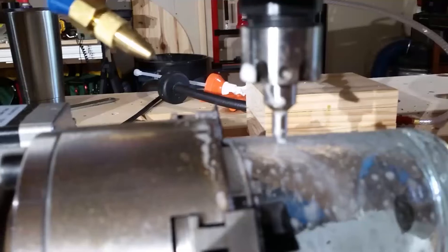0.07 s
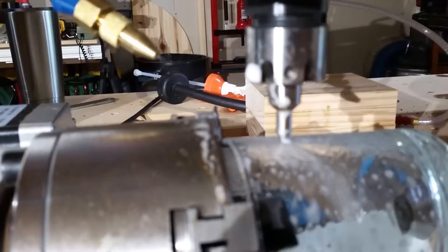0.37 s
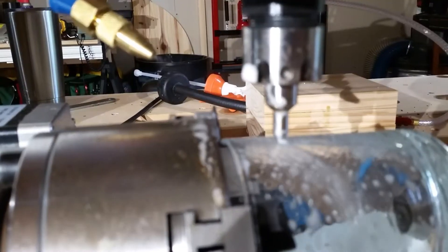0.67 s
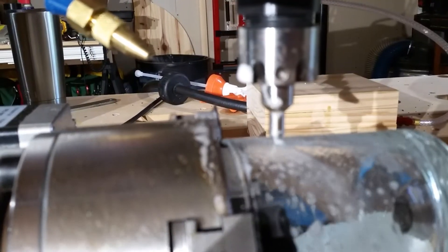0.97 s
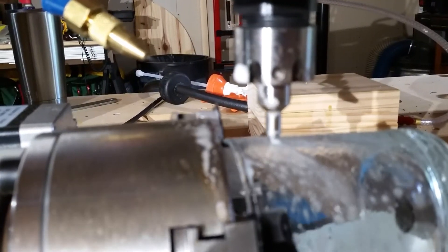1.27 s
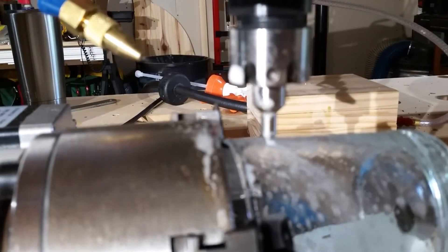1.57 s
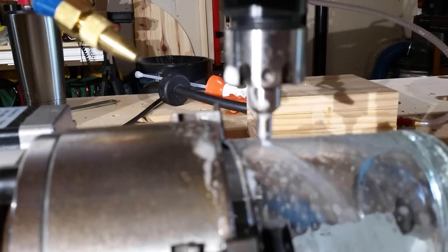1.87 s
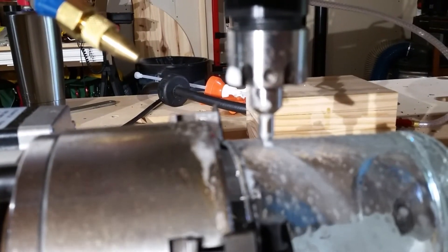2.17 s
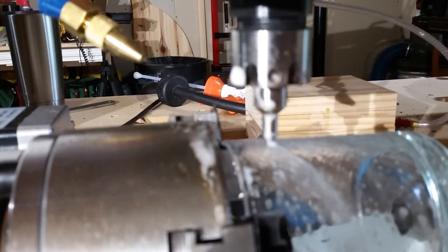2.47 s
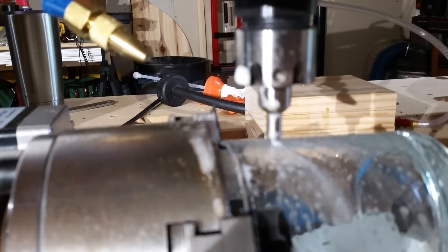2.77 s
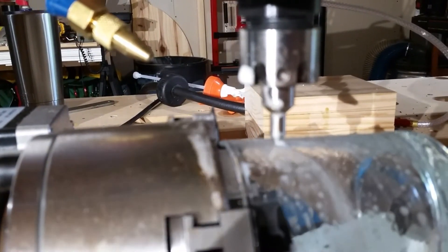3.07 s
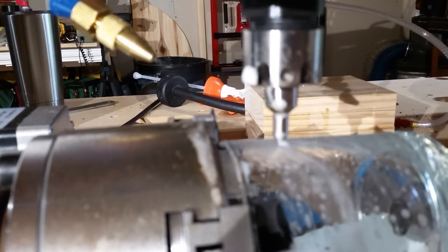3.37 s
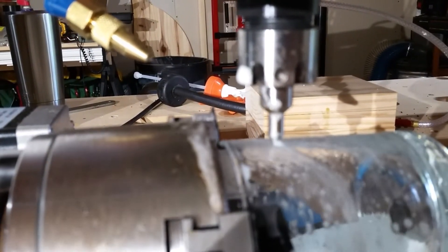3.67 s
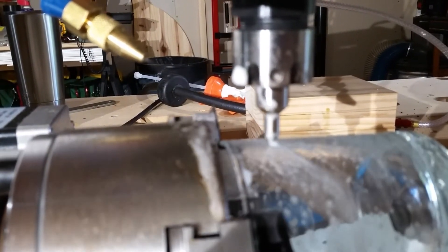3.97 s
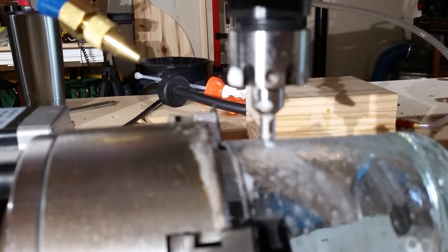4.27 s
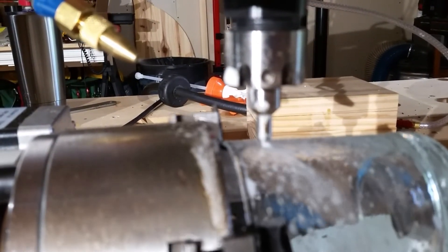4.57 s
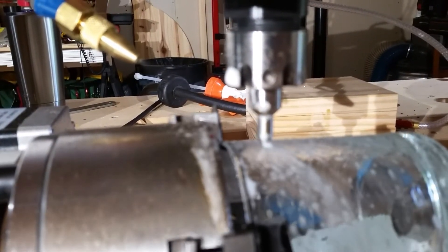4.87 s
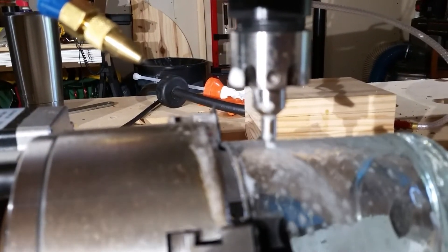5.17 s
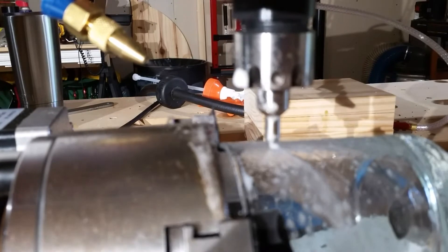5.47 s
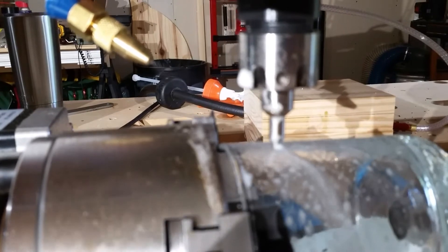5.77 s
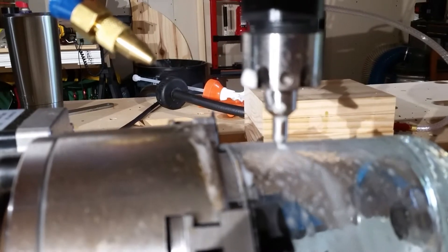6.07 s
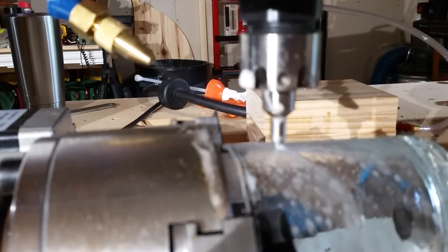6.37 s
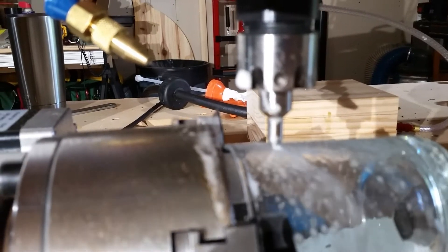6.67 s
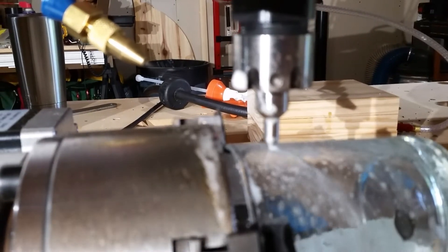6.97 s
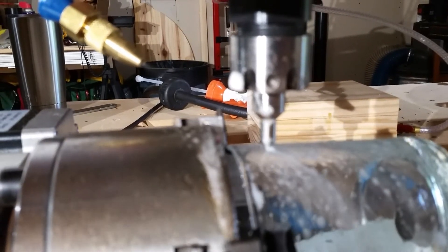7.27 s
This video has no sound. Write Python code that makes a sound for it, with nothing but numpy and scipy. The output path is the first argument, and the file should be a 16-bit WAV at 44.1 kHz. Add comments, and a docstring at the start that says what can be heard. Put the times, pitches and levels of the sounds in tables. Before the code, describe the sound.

Close workshop sound of glass being engraved: bursts of gritty chipping ticks above a steady spindle drone and bright spray hiss.

```python
"""Engraving a glass bottle

A diamond bit scratches a bottle turning in a rotary chuck and chips it in runs of short, damped ticks.
The spindle throbs once a turn, the frame rumbles and a coolant mist hisses; all three rise and fall
together in level. The sound is close and fades in; a limiter briefly ducks it around the hardest ticks."""
import sys
import numpy as np
from scipy import signal
from scipy.fft import rfft, irfft, next_fast_len
from scipy.io import wavfile
from scipy.ndimage import uniform_filter1d, minimum_filter1d, map_coordinates

SR = 44100
rng = np.random.default_rng(int(sys.argv[2]) if len(sys.argv) > 2 else 0)


def generate_wav(sig):
    """Save sig (samples, or channels by samples) to the path in sys.argv[1] as 16-bit PCM at SR."""
    pcm = np.round(np.clip(np.atleast_2d(sig).T, -1, 1) * 32767).astype(np.int16)
    wavfile.write(sys.argv[1], SR, pcm)


N = 322812


def amp(db):
    """Decibels to gain."""
    return 10 ** (np.asarray(db) / 20)


def unit(x):
    """Scale to rms 1."""
    return x / np.sqrt(np.mean(x ** 2) + 1e-20)


def pan(right_db):
    """Left and right gains, right_db apart."""
    return amp([[-right_db / 2], [right_db / 2]])


def along(rows, hz, column=1):
    """One column of a frequency table, read on a log axis."""
    table = np.transpose(rows)
    return np.interp(np.log(hz + 1), np.log(table[0] + 1), table[column])


def lift(peaks, hz):
    """Boost in dB from narrow resonances."""
    return sum(db * np.exp(-((hz - centre) / width) ** 2) for centre, width, db in peaks)


def curve(rows):
    """One value per sample from (seconds, value) rows."""
    return np.interp(np.arange(N) / SR, *np.transpose(rows))


def wobble(knots_per_s):
    """Smooth random curve."""
    knots = rng.standard_normal(int(N * knots_per_s / SR) + 4)
    return map_coordinates(knots, [np.arange(N) * knots_per_s / SR])


def filtered(x, response):
    """Apply a complex frequency response."""
    size = next_fast_len(N + SR // 2)
    return irfft(rfft(x, size) * response(np.fft.rfftfreq(size, 1 / SR)), size)[..., :N]


# Modes of the clamped, wet bottle. Each row: centre in Hz, width in Hz, left in dB, right in dB.
BOTTLE_MODES = [(2000, 440, -23, -1.5), (2850, 93, -10, 17), (2990, 150, -30, 11), (4010, 180, -31, 6.5),
                (5520, 280, -16, -1.5), (6190, 96, -24, -2), (7907, 130, -14, 12.5), (9535, 140, 2, 17.5),
                (10300, 1000, -30, -3), (11700, 240, -9, 2), (13430, 200, -18, 2), (14400, 290, -35, -18)]


def bottle(hz, crack_db=-13, low_cut_hz=1400):
    """Stereo response of the glass: damped modes plus the bare crack."""
    modes = sum(amp([[left], [right]]) * 1j * hz * width / (centre ** 2 - hz ** 2 + 1j * hz * width)
                for centre, width, left, right in BOTTLE_MODES)
    radiation = (1j * hz / (low_cut_hz + 1j * hz)) ** 2  # a small wall radiates little bass
    return (modes + amp(crack_db) * pan(8)) * radiation


# Large chips breaking off. Each row: start in seconds, level in dB, relative treble in dB.
LARGE_CHIPS = [(0.6507, -25, 4), (0.7732, -32.5, 2), (0.801, -35, 1), (0.8384, -33, 1), (0.8656, -37, 3),
               (0.9298, -22.5, 1.5), (1.1157, -23.5, 2), (1.2214, -31.5, -2), (1.2507, -33, 0),
               (1.2643, -25, 2), (1.3313, -24, 8), (1.3896, -36, -2), (1.4291, -25.5, -1.5),
               (1.507, -30.5, -1), (1.561, -29.5, 5), (1.6619, -27.5, -3), (1.6709, -27, -1),
               (1.6895, -35, 2), (3.2783, -30, 2), (3.3807, -26.5, 4.5), (3.4423, -25.5, 3),
               (3.473, -27, 2), (3.5323, -27, 0.5), (3.5398, -32, -6), (3.5751, -28, 0.5), (3.6199, -33, 2),
               (3.6544, -31, -4), (3.7108, -35, 6), (3.738, -33.5, -1), (3.8111, -35.5, -1),
               (3.8702, -35, 4), (4.0981, -26.5, 3), (4.2761, -35, 5), (4.3214, -33.5, 5),
               (4.3478, -26.5, 3), (4.5436, -30.5, 7.5), (4.5832, -31, 1.5), (6.0784, -30, 1),
               (6.2004, -26, 1), (6.2412, -36, -4), (6.26, -27, 2), (6.2725, -34, 0), (6.3707, -28, 2.5),
               (6.394, -32, -1), (6.445, -26.5, 4), (6.4777, -32.5, 2), (6.4996, -31.5, 0),
               (6.5262, -25, 5.5), (6.5663, -26.5, 1), (6.5713, -30, 5), (6.5918, -34, 3),
               (6.6446, -27, -2.5), (6.791, -35, 2), (6.9354, -38, -2), (7.218, -28.5, 4), (7.2399, -26, 4)]


def chips(rows, crumble_s=0.0032, rise_s=0.0004, crack=2.1, split_hz=6500, size=2048):
    """A crack and brief crumbling ring the bottle; each tick has its own level and brightness."""
    t, hz = np.arange(size) / SR, np.fft.rfftfreq(size, 1 / SR)
    treble = hz ** 8 / (hz ** 8 + split_hz ** 8)
    glass, out = bottle(hz), np.zeros((2, N + size))
    for start_s, db, treble_db in rows:
        force = rng.standard_normal(size)
        decay_s = crumble_s * amp(2 * rng.standard_normal())
        force *= np.exp(-(t / decay_s) ** 2) * (1 - np.exp(-t / rise_s))
        force[0] += crack
        ring = rfft(force) * glass
        dull, bright = irfft([ring * (1 - treble), ring * treble])[..., :size // 2]
        tick = unit(dull) + amp(treble_db) * unit(bright)
        out[:, round(start_s * SR):][:, :size // 2] += amp(db) * tick
    return out[:, :N]


# The bit bites into the glass. Each row: start in seconds, end in seconds, scratch level in dB.
BIT_BITES = [(0.661, 0.956, -36), (1.2, 1.717, -38.5), (3.419, 3.86, -36), (4.267, 4.58, -40),
             (6.05, 6.621, -35)]


def grit(offset_db, grains_per_s=320, spread_db=5, dull_hz=6000, attack_s=0.14, release_s=0.034):
    """Diamond grains scratch the glass at random, harder where the bit bites."""
    t = np.arange(N) / SR
    hits = rng.random(N) < grains_per_s / SR
    grains = hits * amp(spread_db * np.clip(rng.standard_normal(N), -2, 2))
    grains *= rng.choice([-1, 1], N)
    scratch = filtered(grains, lambda hz: bottle(hz) / (1 + 1j * hz / dull_hz))
    bite = sum(amp(db) * np.interp(t, [start - attack_s, start, end, end + release_s], [0, 1, 1, 0])
               for start, end, db in BIT_BITES)
    skim = amp(-45.5 + 1.05 * offset_db)
    return np.maximum(bite, skim) * unit(scratch)


def flakes(per_s=21, offset_db=-1.5, spread_db=0.8, treble_db=2.5, max_count=30):
    """Small chips come loose unevenly during each bite; returns rows for chips()."""
    rows = []
    for start_s, end_s, scratch_db in BIT_BITES:
        for k, (slip, strength, colour) in enumerate(rng.standard_normal((max_count, 3))):
            at_s = start_s + (k + 0.5 + 0.3 * slip) / per_s
            if at_s < end_s:
                rows.append((at_s, scratch_db + offset_db + spread_db * strength, treble_db + 2 * colour))
    return rows


# Spindle speed. Each row: time in seconds, turns per second.
SPINDLE_SPEED = [(0.45, 47.7), (1.94, 47.7), (2.85, 47.6), (2.91, 47.3), (5.33, 47.3), (5.37, 47.5),
                 (5.41, 48.2), (5.49, 47.6), (6.17, 47.6), (6.27, 47.3), (7.3, 47.3)]
# Harmonics of one turn. Each row: multiple of the speed, level in dB.
SPINDLE_ORDERS = [(1, -10.5), (2, -18), (3, -4), (4, 3), (5, 1), (6, -12.5), (7, -17), (8, -16.5),
                  (9, -9.5)]


def spindle(turns, level_db, waver_db=1.1, shake_db=0.8, jitter_turns=0.0023, ring_hz=222, width_hz=36):
    """One slightly uneven push per turn; its orders lag across the machine's low resonance."""
    mean_hz = np.mean(np.transpose(SPINDLE_SPEED)[1])
    angle = 2 * np.pi * (turns + jitter_turns * wobble(45))
    throb = np.zeros(N)
    for order, db in SPINDLE_ORDERS:
        lag = 2 * np.arctan((order * mean_hz - ring_hz) / width_hz)
        throb += amp(db + waver_db * wobble(7)) * np.cos(round(order) * angle - lag)
    return amp(level_db) * unit(throb * amp(shake_db * wobble(45))) * pan(4.65)


# Jet spectrum. Each row: frequency in Hz, left in dB, right in dB.
MIST_SPECTRUM = [(403, -12.5, -5.5), (1050, -25, -15), (1285, -10.5, -6.5), (2460, -18.5, -7.5),
                 (3390, -9.5, -4.5), (4520, -21, -10.5), (6490, -10, -11.5), (7270, -2.5, -7.5),
                 (9600, -7, -3), (10760, -17.5, 1), (12530, -14.5, -11), (13500, -17.5, -15),
                 (15600, -18.5, -9.5)]
# Nozzle resonances. Each row: centre in Hz, width in Hz, lift in dB.
NOZZLE_PEAKS = [(5150, 530, 4), (6185, 240, 4.5), (11470, 120, 3)]


def mist(level_db, sputter_db=1.18):
    """Air tears the coolant into droplets: a bright, sputtering hiss coloured by the nozzle."""
    def colour_db(hz):
        sides_db = np.array([along(MIST_SPECTRUM, hz, column) for column in (1, 2)])
        return sides_db + lift(NOZZLE_PEAKS, hz)

    jet = stereo_noise(colour_db)
    return amp(level_db + sputter_db * wobble(400) + 0.42 * wobble(25)) * jet


# Frame spectrum. Each row: frequency in Hz, level in dB.
FRAME_SPECTRUM = [(15, -9), (35, -18), (70, -6), (115, -11), (200, 0.5), (300, -1.5), (450, -7),
                  (620, -9.5), (780, -12.5), (1000, -16.5), (1400, -24), (3000, -51.5)]
# Panel resonances. Each row: centre in Hz, width in Hz, lift in dB.
PANEL_PEAKS = [(331.5, 7.6, 3), (504, 12, 2.5), (756, 20, 6), (905, 37, 4.5), (963, 14, 2.5)]


def frame(turns, level_db, swing_db=0.5):
    """Bearings rumble through the frame, swelling once a turn."""
    swing = amp(swing_db * np.cos(2 * np.pi * (turns - 0.2)) + 0.45 * wobble(12))
    rumble = stereo_noise(lambda hz: along(FRAME_SPECTRUM, hz) + lift(PANEL_PEAKS, hz))
    return amp(level_db) * unit(swing * rumble) * pan(5.75)


# Chuck spectrum. Each row: frequency in Hz, level in dB.
CHUCK_SPECTRUM = [(15, -45), (30, -16), (45, -6), (75, 1), (115, -8), (180, -14), (400, -54)]
# Shudders. Each row: centre in seconds, level in dB, half-length in seconds.
CHUCK_SHUDDERS = [(3.323, -41, 0.091), (4.32, -42, .05), (5.35, -37, 0.44), (6.27, -43, 0.11)]


def chuck(idle_db=-51.5):
    """The heavy chuck rumbles low and shudders now and then."""
    t = np.arange(N) / SR
    shudders = sum(amp(db) * np.exp(-((t - at_s) / half_s) ** 2) for at_s, db, half_s in CHUCK_SHUDDERS)
    return (amp(idle_db) + shudders) * stereo_noise(lambda hz: along(CHUCK_SPECTRUM, hz)) * pan(3.5)


# Stereo likeness of the noise. Each row: frequency in Hz, left-right correlation.
CORRELATION = [(60, 0.65), (200, 0.74), (400, 0.69), (800, 0.64), (1400, 0.0038), (3500, -0.32),
               (6000, 0.46), (7800, 0.85), (9500, -0.092), (14000, -0.0091)]


def stereo_noise(colour_db):
    """Coloured noise of rms 1 whose stereo width varies with frequency."""
    def mid_side_gains(hz):
        angle = np.arccos(np.clip(along(CORRELATION, hz), -1, 1)) / 2
        return np.array([np.cos(angle), np.sin(angle)])

    mid, side = filtered(rng.standard_normal((2, N)), mid_side_gains)
    return unit(filtered(np.array([mid + side, mid - side]), lambda hz: amp(colour_db(hz))))


def reflections(x, echo_db=-19, delay_range_s=(0.001, 0.005), count=6):
    """Chuck, bench and column return weak early copies that ripple the colour."""
    out = x.copy()
    for side, delays_s in enumerate(rng.uniform(*delay_range_s, (2, count))):
        for delay_s in delays_s:
            echo = np.pad(x[side], (round(delay_s * SR), 0))[:N]
            out[side] += amp(echo_db) * rng.choice([-1, 1]) * echo
    return out / np.sqrt(1 + count * amp(echo_db) ** 2)


# Room decay. Each row: frequency in Hz, T60 in seconds.
WORKSHOP_T60 = [(200, 0.13), (3000, 0.053), (12000, 0.083)]


def workshop(x):
    """Short room tail; the bass lasts longest."""
    hz, t, noise = signal.stft(rng.standard_normal((2, SR // 3)), SR, nperseg=256)
    decay = amp(-60 * t / along(WORKSHOP_T60, hz)[:, None])
    tail = signal.istft(noise * decay, SR, nperseg=256)[1]
    return signal.fftconvolve(x.mean(0)[None], tail / np.linalg.norm(tail[0]), axes=1)[:, :N]


def limiter(x, threshold_db=-6, share=0.71, ahead_s=0.015, hold_s=0.0033, glide_s=0.012):
    """The gain glides down ahead of each peak, takes off a share of the excess and recovers."""
    peak_db = 20 * np.log10(np.abs(x).max(0) + 1e-9)
    needed_db = share * np.minimum(threshold_db - peak_db, 0)
    ahead, hold = round(ahead_s * SR), round(hold_s * SR)
    held_db = minimum_filter1d(needed_db, ahead + hold + 1, origin=(hold - ahead) // 2)
    return x * amp(uniform_filter1d(held_db, round(glide_s * SR)))


# Throb, rumble and hiss rise and fall together in level. Each row: time in seconds, offset in dB.
BACKGROUND_LEVEL = [(0.7, -1.1), (1.21, 2), (1.57, -2.3), (1.81, -1), (1.99, -2.2), (2.41, 1.8), (3.1, 1.1),
                    (3.16, 2.5), (3.58, -1.5), (3.7, -0.3), (4.33, -1.5), (4.42, 0.7), (4.6, 0.7),
                    (4.72, 1.2), (5.92, 1.7), (6.49, -2.5), (6.91, -1.4), (7.27, -2)]


def scene(throb_db=-28, rumble_db=-33, mist_db=-27.5, room_db=-8.5, left_lead_s=0.00024):
    """Machine, mist and glass together; the drone reaches the left side first."""
    offset_db = curve(BACKGROUND_LEVEL)
    turns = np.cumsum(curve(SPINDLE_SPEED)) / SR
    drone = spindle(turns, throb_db + 1.18 * offset_db) + frame(turns, rumble_db + offset_db) + chuck()
    drone = filtered(drone, lambda hz: np.exp(1j * np.pi * hz * left_lead_s * np.array([[1], [-1]])))
    hiss = reflections(mist(mist_db + 0.82 * offset_db))
    scratch = grit(offset_db)
    ticks = chips(list(LARGE_CHIPS) + flakes())
    return drone + hiss + scratch + ticks + amp(room_db) * workshop(ticks)


def record(dry, fade_in_s=(0.41, 0.63), top_hz=15800):
    """Limiter, linear fade-in and steep low-pass."""
    fade = np.interp(np.arange(N) / SR, fade_in_s, [0, 1])
    return filtered(limiter(dry) * fade, lambda hz: 1 / (1 + (hz / top_hz) ** 300))


dry = scene()
out = record(dry)
generate_wav(out)
```